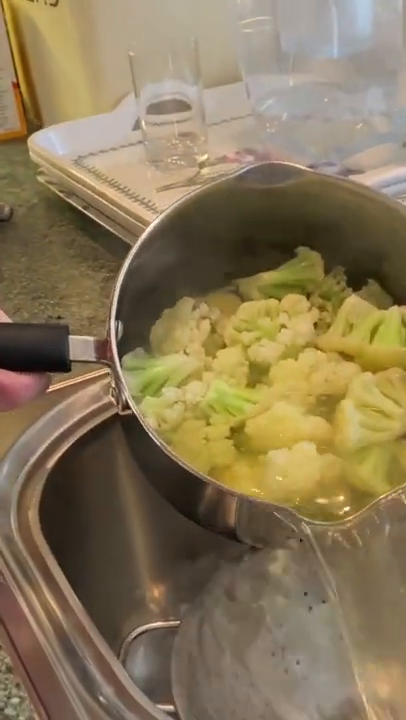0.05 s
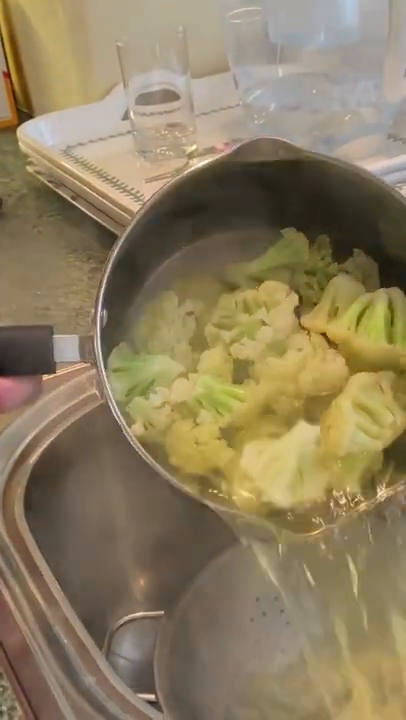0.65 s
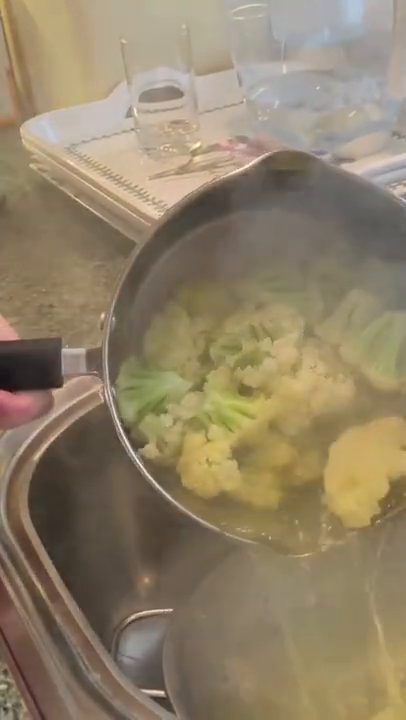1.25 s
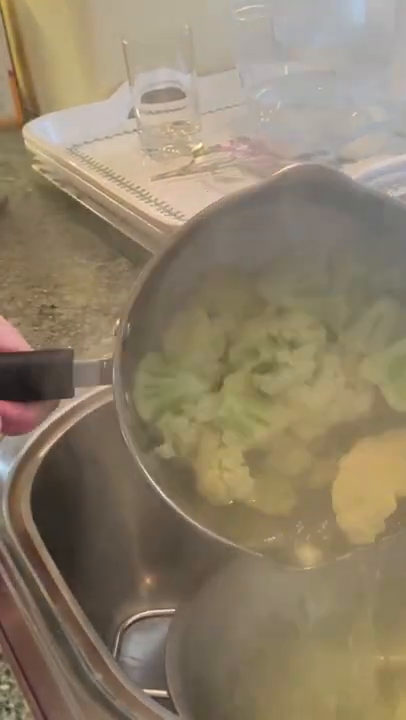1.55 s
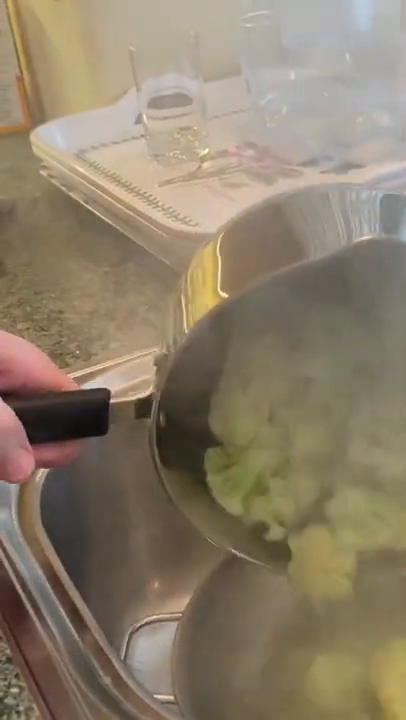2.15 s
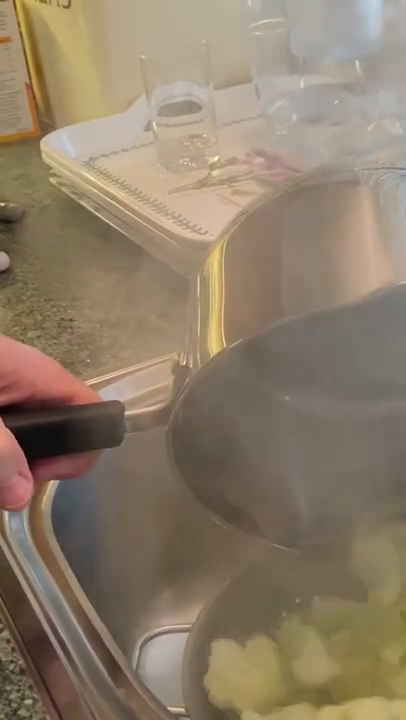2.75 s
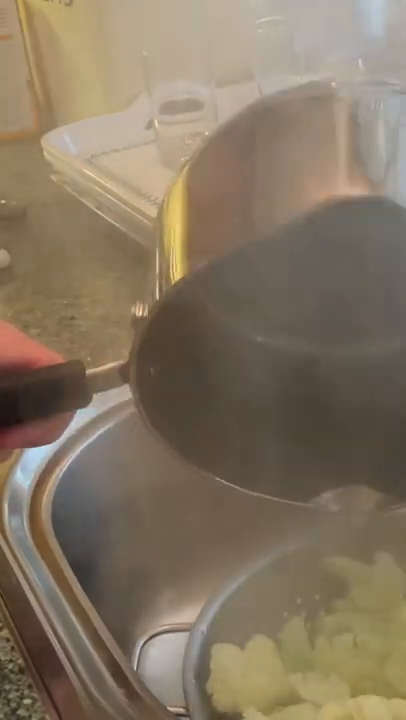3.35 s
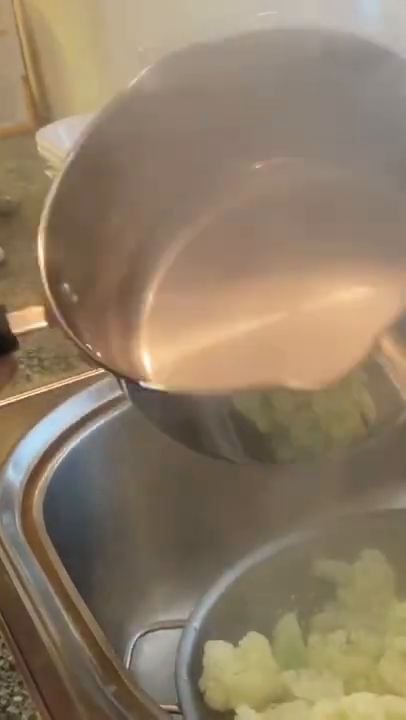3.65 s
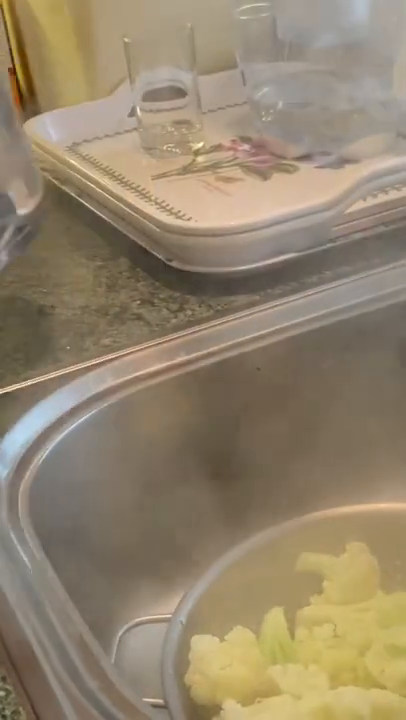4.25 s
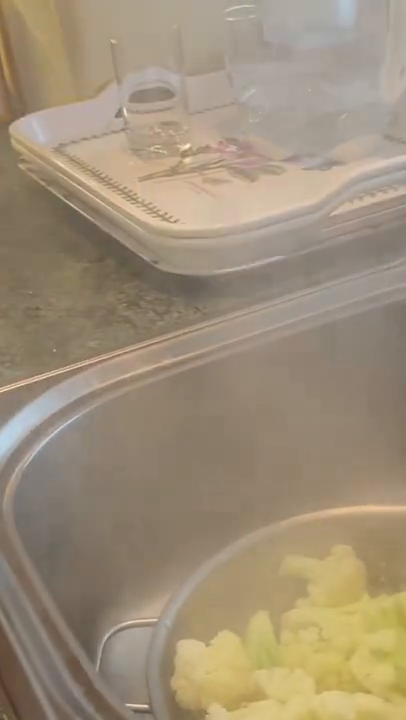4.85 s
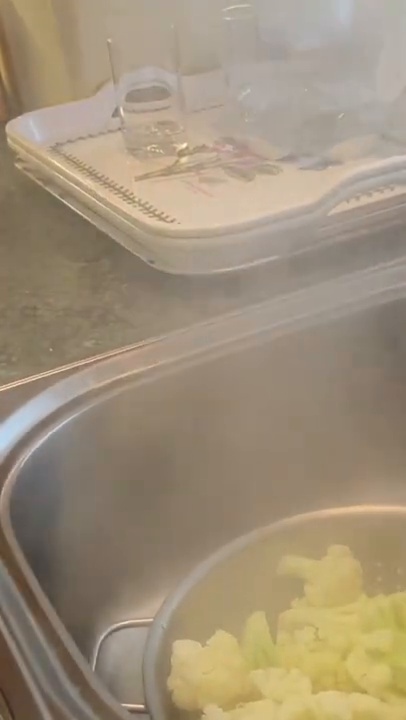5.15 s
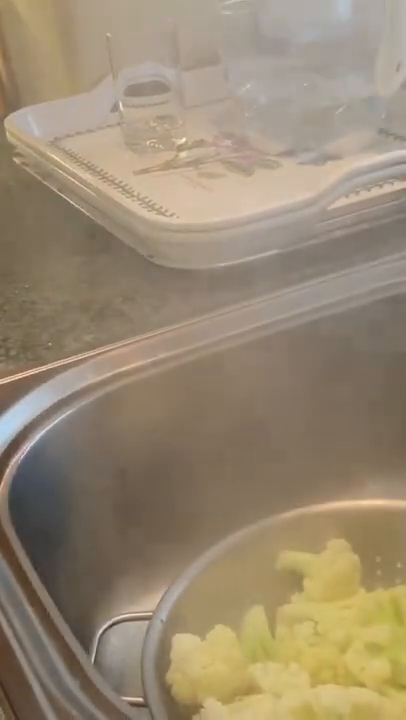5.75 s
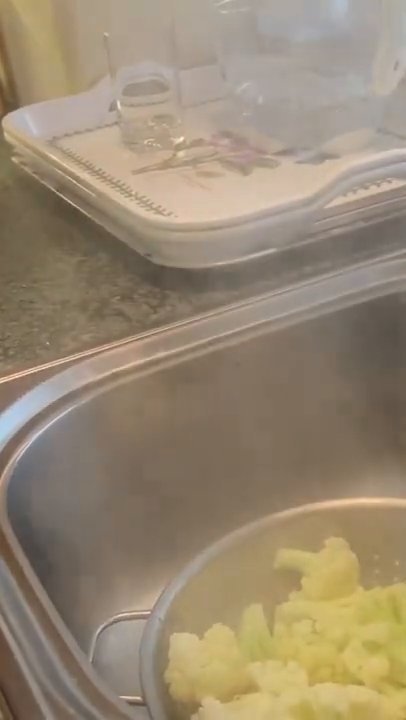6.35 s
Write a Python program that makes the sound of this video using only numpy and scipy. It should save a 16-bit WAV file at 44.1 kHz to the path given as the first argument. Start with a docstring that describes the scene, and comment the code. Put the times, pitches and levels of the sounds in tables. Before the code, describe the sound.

Water splashes into a steel sink as cooked cauliflower thuds into a colander, then the empty saucepan scrapes and clangs down hard.

```python
"""Water hisses and gurgles into a steel sink while cauliflower florets thud on the metal, tipped hot
from a saucepan into a colander. The water dribbles away, the pan scrapes, spray sizzles, then the empty
pan is knocked and set down hard, close by in a small kitchen. Water is a hail of tiny impacts plus
bubbles and drops; blows are decaying noise plus modes of basin and pan; scrapes are dense impacts
with brief wavering notes."""
import sys
import numpy as np
from scipy import signal
from scipy.fft import rfft, irfft
from scipy.io import wavfile
from scipy.ndimage import uniform_filter1d

SR = 44100
rng = np.random.default_rng(int(sys.argv[2]) if len(sys.argv) > 2 else 0)


def output_pcm(signal):
    """Save a mono or channel-first signal as 16-bit PCM at the path in sys.argv[1].

    Samples are clipped to [-1, 1] before scaling.
    """
    pcm = np.clip(np.atleast_2d(signal).T, -1, 1) * 32767
    wavfile.write(sys.argv[1], SR, np.round(pcm).astype(np.int16))


N = 282240

# basin modes: f/Hz, level/dB
SINK_MODES = [(239, -17.5), (297, 4), (328, 0), (377, -5), (430, -1), (491, 6.5), (548, 5), (640, 5),
              (923, -8)]
# spectrum of water on steel: f/Hz, level/dB
WATER_SPECTRUM = [(120, -25.5), (200, -18.5), (300, 3.5), (550, 0.5), (900, -4), (2200, -2), (4000, -13),
                  (5200, -12), (6800, -7.5), (7700, -20), (10500, -23), (13300, -13.5), (15000, -33)]
WATER_EDGES_HZ = [800, 4500, 7500]  # gurgle | splash | hiss | fizz
CONTROL_S, DROP_DECAY_S = .004, .004


def gain_of(db):
    """Decibels to amplitude."""
    return 10 ** (np.asarray(db) / 20)


def unit_rms(x):
    """Scales to rms 1."""
    return x / np.sqrt(np.mean(x ** 2) + 1e-20)


def add(mix, start_s, sound):
    """Mixes a sound in at start_s."""
    part = mix[max(round(start_s * SR), 0):][:len(sound)]
    part += sound[:len(part)]


def colour(x, spectrum, lo=1, hi=SR, ripple_db=0, size=4096, order=12):
    """Minimum-phase filter: a spectrum cut to lo-hi Hz, rippled as by many close resonances."""
    hz = np.fft.rfftfreq(size, 1 / SR) + 1
    f, db = np.transpose(spectrum)
    gain = gain_of(np.interp(np.log(hz), np.log(f), db - db.max()))
    gain /= np.sqrt((1 + (lo / hz) ** order) * (1 + (hz / hi) ** order))
    gain *= gain_of(ripple_db * unit_rms(uniform_filter1d(rng.standard_normal(len(hz)), 11)))
    cepstrum = irfft(np.log(gain + 1e-5))
    cepstrum[1:size // 2] *= 2
    cepstrum[size // 2 + 1:] = 0
    return signal.fftconvolve(x, irfft(np.exp(rfft(cepstrum)))[:size // 2])[:len(x)]


def bands(edges_hz):
    """(lo, hi) pairs that split the whole range."""
    return zip([1] + edges_hz, edges_hz + [SR])


def swell(t, start_s, length_s, t60_s, levels_db, rise_share, arch_db):
    """Band powers of one gush or stroke: it builds, arches and dies away."""
    done = np.clip((t - start_s) / length_s, 0, 1)
    db = np.c_[levels_db] - np.c_[arch_db] * (2 * done - 1) ** 2
    db -= 60 * np.maximum(t - start_s - length_s, 0) / t60_s
    return (np.minimum(done / np.c_[rise_share], 1) * gain_of(db)) ** 2


def water_levels():
    """Gushes over a trickle, as rows of t/s and four band levels/dB."""
    # gushes: t/s, length/s, t60/s, gurgle/dB, splash/dB, hiss/dB, fizz/dB
    gushes = [(0.0, 0.24, 0.5, -67, -69, -46, -67), (0.115, 0.57, 0.58, -59, -43.5, -43, -55.5),
              (0.64, 0.42, 1, -24.5, -40, -69, -58.5), (1.081, 0.009, 0.2, -32, -36, -50, -33.5),
              (2.061, 0.15, 0.44, -54, -52, -54.5, -58), (2.225, 0.046, 0.54, -44.5, -44, -55, -53.5),
              (4.091, 0.99, 0.39, -36, -38.5, -43, -45.5), (5.052, 0.055, 0.1, -42.5, -39.5, -44, -50)]
    # colander draining: t/s, level/dB
    trickle = [(0.1, -79), (1.2, -61.5), (2.0, -60), (2.45, -57.5), (2.95, -60), (3.25, -74), (4.05, -84),
               (5.3, -45), (6.4, -49)]
    ref_db, bands_at_ref_db, db_per_db = -65, [-59, -70.5, -76.5, -77.5], [.55, 1.022, 1.03, 1.05]
    rise_share, arch_db = [.49, .058, .027, .22], [15.2, 7.3, 4.6, 4.8]
    t = np.arange(0, N / SR, CONTROL_S)
    trickle_db = np.interp(t, *np.transpose(trickle)) - ref_db
    power = gain_of(np.c_[bands_at_ref_db] + np.c_[db_per_db] * trickle_db) ** 2
    for s, length_s, t60_s, *levels_db in gushes:
        power += swell(t, s, length_s, t60_s, levels_db, rise_share, arch_db)
    return np.column_stack([t, *10 * np.log10(power)])


def hail(curve, spectrum, edges_hz, per_s, spread_db, wash, tail_s, patchy_db, ripple_db):
    """Tiny impacts with noisy tails over an even wash; the resonances they stir keep shifting."""
    s, *levels_db = np.transpose(curve)
    t, out = np.arange(N) / SR, np.zeros(N)
    for db, patch_db, (lo, hi) in zip(levels_db, patchy_db, bands(edges_hz)):
        hits = gain_of(spread_db * np.minimum(rng.exponential(1, N), 4.5)) * (rng.random(N) < per_s / SR)
        tails = np.sqrt(signal.lfilter([1], [1, -np.exp(-2 / (tail_s * SR))], hits ** 2))
        drive = .5 * unit_rms(hits * rng.choice([-1, 1], N))
        drive += (unit_rms(tails) + wash) * rng.standard_normal(N)
        frames = signal.stft(drive, nperseg=512)[2]
        patches = uniform_filter1d(rng.standard_normal(frames.shape), 5, axis=0)
        patches = unit_rms(uniform_filter1d(patches, 6, axis=1))
        drive = signal.istft(frames * gain_of(patch_db * patches))[1][:N]
        out += gain_of(np.interp(t, s, db)) * unit_rms(colour(drive, spectrum, lo, hi, ripple_db))
    return out * np.interp(t, [s[0] - .02, s[0], s[-1], s[-1] + .03], [0, 1, 1, 0])


def water(curve):
    """Droplets pelt the steel, each size in its own band; fine spray is the most even."""
    return gain_of(-3.14) * hail(curve, WATER_SPECTRUM, WATER_EDGES_HZ, per_s=1100, spread_db=4,
                                 wash=.5, tail_s=.004, patchy_db=[5, 4, 3, 2], ripple_db=2)


def bubbles(curve, per_s=26, level_db=-4.5, decay_cycles=21.3, count=280):
    """Bubbles pop with a short rising note; level follows the water in their band."""
    s, *levels_db = np.transpose(curve)
    out, t, at_s = np.zeros(N), np.arange(SR // 16) / SR, 0
    for wait, pitch, size in rng.random((count, 3)):
        at_s += 2 * wait / per_s
        hz = 350 * 7 ** pitch
        water_db = np.interp(at_s, s, levels_db[np.searchsorted(WATER_EDGES_HZ, hz)])
        age = t * hz / decay_cycles
        note = np.exp(-age) * np.sin(2 * np.pi * hz * t * (1 + .013 * age))
        add(out, at_s, gain_of(water_db + level_db + 9.9 * size ** 2) * note)
    return out


def plops(swell_s=.0082, bend=.1, linger_s=.03):
    """Soft florets and drops swell one resonance; the wet smear around it grows with pitch."""
    # soft landings: t/s, level/dB, f/Hz
    landings = [(0.0, -49, 557), (1.121, -37, 470), (1.234, -40.5, 504), (1.344, -46, 505),
                (1.53, -48, 514), (2.169, -49, 382), (2.426, -47.5, 734), (2.44, -50, 283),
                (2.578, -56, 950), (2.655, -45.5, 295), (2.859, -52.5, 483), (3.059, -47, 486),
                (3.111, -67.5, 1910), (3.46, -40.5, 336), (3.509, -45, 293), (3.535, -53, 1166),
                (3.62, -51, 650), (3.675, -56, 1170), (3.721, -46.5, 356), (3.795, -52, 417),
                (3.8, -56, 1290), (3.845, -56.5, 1830), (3.859, -42, 412)]
    out, t = np.zeros(N), np.arange(SR // 6) / SR
    for s, db, hz in landings:
        age = t / swell_s
        hump = age * np.exp(1 - age) + .25 * np.tanh(age) * np.exp(-t / linger_s)
        tone = np.sin(2 * np.pi * np.cumsum(hz * (1 + bend * (hump - .5))) / SR)
        smear = unit_rms(colour(rng.standard_normal(len(t)), WATER_SPECTRUM, hz * .66, hz * .99))
        add(out, s, gain_of(db) * hump * (2.21 * tone + .6 * hz / 800 * smear))
    return out


def spit(lo_hz, hi_hz, tail_db=-9, t60_s=.12):
    """One drop on steel: a tick and a short wet tail."""
    t = np.arange(SR // 8) / SR
    fall = np.exp(-t / DROP_DECAY_S) + gain_of(tail_db - 60 * t / t60_s)
    band = signal.butter(4, [lo_hz, min(hi_hz, SR / 2 - 10)], "bandpass", fs=SR, output="sos")
    return signal.sosfilt(band, fall * unit_rms(signal.sosfilt(band, rng.standard_normal(len(t)))))


def drops(curve, per_band_per_s=7, level_db=-6, spread_db=11):
    """Large drops spit on bare steel; small ones tick at a level that follows the water."""
    # large drops: t/s, level/dB, low f/Hz, high f/Hz
    large_drops = [(0.46, -34.5, 5170, 7100), (2.993, -31, 790, 1880), (3.896, -31, 856, 1720),
                   (3.947, -33.5, 1000, 1760), (4.172, -31.5, 1710, 6240), (4.256, -30, 1280, 2360),
                   (4.316, -43, 5060, 14100), (4.488, -39, 1000, 6050), (4.529, -29.5, 3120, 7000),
                   (4.703, -32, 1510, 7560), (4.768, -27, 338, 2230)]
    s, *levels_db = np.transpose(curve)
    out = np.zeros(N)
    for at_s, db, lo, hi in large_drops:
        add(out, at_s, gain_of(db) * spit(lo, hi))
    for hz in np.geomspace(1800, 13000, 12):
        tick = spit(hz * .75, hz * 1.3)
        tick *= np.exp(-np.arange(len(tick)) / SR / DROP_DECAY_S)
        for when, size in rng.random((int(per_band_per_s * N / SR), 2)):
            at_s = when * N / SR
            water_db = np.interp(at_s, s, levels_db[np.searchsorted(WATER_EDGES_HZ, hz)])
            add(out, at_s, gain_of(water_db + level_db + spread_db * size ** 2) * tick)
    return out


def ring(modes, t, t60_s, scatter_db=0, detune=0, beat_hz=14):
    """Decaying modes in beating pairs; each blow lands elsewhere, scattering level and pitch."""
    hz, db = np.transpose(modes)[:, :, None]
    size = gain_of(db + scatter_db * rng.standard_normal(db.shape)) * rng.choice([-1, 1], db.shape)
    hz = hz * (1 + detune * rng.standard_normal(db.shape))
    twin_hz = hz + beat_hz * rng.standard_normal(db.shape)
    pairs = np.sin(2 * np.pi * hz * t) + .5 * np.sin(2 * np.pi * twin_hz * t)
    contact = 1 - np.exp(-(t / .0012) ** 2)
    return (size * pairs).sum(0) * contact * gain_of(-60 * t / t60_s) / np.sqrt((size ** 2).sum())


def sheet(t, levels_db, edges_hz, t60_s, spectrum, crack_db, crack_s, t60_scales, rattle):
    """Struck sheet metal: a crack, then dense modes as rattling noise that decays band by band."""
    out = np.zeros(len(t))
    for db, (lo, hi), scale in zip(levels_db, bands(edges_hz), t60_scales):
        fall = gain_of(-60 * t / (t60_s * scale)) + gain_of(crack_db) * np.exp(-t / crack_s)
        chatter = np.exp(rattle * unit_rms(uniform_filter1d(rng.standard_normal(len(t)), 150)))
        part = colour(rng.standard_normal(len(t)) * fall * chatter, spectrum, lo, hi, ripple_db=3.2)
        out += gain_of(db) * part / np.sqrt((part ** 2).sum() / (SR * .017))
    return out


def sink_thuds(t60_s=.24, push_s=.032, thud_top_hz=800, splash_top_hz=7500, fizz_db=-8.5):
    """Florets, and a few later heavy drops, drum on sink and colander: a short heavy push, then a quieter ring."""
    # landings: t/s, thud/dB, clack/dB, splash/dB, main resonance/Hz, top of clack/Hz
    landings = [(0.134, -37.5, -29, -51, 958, 2110), (0.515, -30.5, -32.5, -42, 337.5, 2010),
                (0.572, -42.5, -32.5, -41.5, 284, 2200), (0.765, -25, -43, -33.5, 450, 2470),
                (0.817, -16.5, -17, -31.5, 302, 2030), (0.840, -27, -28, -28.5, 396, 2340),
                (0.955, -27.5, -33, -51, 410.4, 2400), (1.086, -32, -38.5, -46.5, 329, 2970),
                (1.303, -38.5, -42, -46.5, 522, 2480), (1.491, -36, -41, -62.5, 303.4, 1557),
                (2.079, -50, -43, -43, 498, 2400), (2.134, -54, -41, -38.5, 659, 2540)]
    # landing spectrum: f/Hz, level/dB
    spectrum = [(190, -15), (300, -2), (420, -0.5), (720, -11), (1550, -15.5), (2100, -21.5), (4000, -33.5),
                (6500, -21.5), (8000, -37.5), (10500, -45), (13000, -27.5), (15000, -49)]
    out, t = np.zeros(N), np.arange(SR // 2) / SR
    push = .22 + np.exp(-(t / push_s) ** 2)
    for s, thud_db, clack_db, splash_db, hz, top_hz in landings:
        levels_db = [thud_db, clack_db, splash_db, splash_db + fizz_db]
        blow = sheet(t, levels_db, [thud_top_hz, top_hz, splash_top_hz], t60_s, spectrum,
                     crack_db=0, crack_s=.009, t60_scales=[.96, 1.4, .56, .44], rattle=.26)
        basin = gain_of(thud_db - .5) * ring(SINK_MODES, t, t60_s, scatter_db=2, detune=.0042)
        tone_db = (thud_db if hz < thud_top_hz else clack_db - 7) + 3.5
        tone = gain_of(tone_db) * ring([(hz, 0)], t, t60_s, beat_hz=6.2)
        add(out, s, blow + (basin + tone) * push)
    return out


def pan_squeaks(wavers=4, roughness=.52):
    """Steel rubbing on steel sustains one unsteady note; the shorter, the raspier."""
    # notes: t/s, length/s, level/dB, f/Hz
    notes = [(3.297, 0.18, -44, 736), (3.43, 0.1, -62, 1750), (3.886, 0.076, -41.5, 288.5),
             (5.811, .11, -28, 333.2), (5.874, 0.025, -44, 2600), (5.961, 0.083, -39, 1884),
             (5.996, 0.035, -37, 3000), (6.093, 0.23, -47, 1950), (6.298, 0.043, -46, 1315)]
    out = np.zeros(N)
    for s, length_s, db, hz in notes:
        t = np.arange(0, length_s, 1 / SR)
        smoothing = signal.butter(2, wavers / length_s, fs=SR, output="sos")
        slip = signal.sosfilt(smoothing, rng.standard_normal((2, SR // 2)))[:, -len(t):]
        waver = 1 + roughness * (unit_rms(slip[0]) + 1j * unit_rms(slip[1]))
        note = (waver * np.exp(2j * np.pi * hz * t)).real
        add(out, s, gain_of(db) * unit_rms(note) * np.sin(np.pi * t / length_s))
    return out


def pan_scrapes(t60_s=.25):
    """The pan slides in short strokes, each a dense run of tiny impacts."""
    # strokes: t/s, length/s, groan/dB, rasp/dB, hiss/dB
    strokes = [(3.298, 0.047, -38, -46.5, -54), (3.391, 0.05, -36.5, -49.5, -54),
               (3.45, 0.13, -40, -65, -74.5), (3.62, 0.098, -50, -56, -95),
               (3.77, 0.021, -47.5, -65, -50.5), (3.812, 0.21, -56, -53, -53.5)]
    # rubbing spectrum: f/Hz, level/dB
    spectrum = [(205, -19.5), (300, 11.5), (560, 3), (730, -5), (900, -17), (1600, -14.5), (2100, -21.5),
                (3400, -36.5), (4200, -43.5), (5000, -31), (6800, -20.5), (8200, -44), (14000, -49)]
    t = np.arange(0, N / SR, CONTROL_S)
    power = sum(swell(t, s, length_s, t60_s, levels_db, rise_share=[.2, .15, .12], arch_db=[7.5, 5, 8])
                for s, length_s, *levels_db in strokes)
    curve = np.column_stack([t, *10 * np.log10(power + 1e-20)])
    return hail(curve, spectrum, WATER_EDGES_HZ[:2], per_s=900, spread_db=2,
                wash=.8, tail_s=.01, patchy_db=[5, 4, 3], ripple_db=3)


def pan_knocks():
    """The pan strikes the sink: the basin booms and the pan wall rings."""
    # hits: t/s, thud/dB, clack/dB, crash/dB, main resonance/Hz, its level/dB, base t60/s
    hits = [(5.183, -15.5, -22, -54, 894, -14, 0.17), (5.263, -20.5, -23.5, -47, 655, -21, 0.092),
            (5.302, -19, -22, -43, 339, -20.5, 0.38), (5.501, -30.5, -40, -24.5, 403, -23.5, 0.34),
            (5.527, -24, -29.5, -24, 491, -24.5, 0.37), (5.568, -16.5, -43, -16, 485.7, -12, 0.26),
            (5.583, -13.5, -18, -16.5, 491, -13, 0.42), (5.736, -29, -33, -31, 544, -28, 0.4),
            (5.772, -19, -20.5, -24, 342, -14, 0.25), (5.799, -25.5, -33, -27, 360, -35, 0.24),
            (6.034, -14, -11.5, -24.5, 239.3, -12.5, 0.28), (6.086, -17, -15, -24.5, 651.5, -13, 0.23)]
    # pan wall modes: f/Hz, level/dB
    pan_modes = [(1176, 11.5), (1732, -6), (1826, -7), (1868, 11.5), (1923, 14.5), (1996, 7.5),
                 (2074, -9.5), (2343, 8.5), (3339, 5), (3726, 1), (4044, -1), (4762, -6), (5055, -18)]
    # knock spectrum: f/Hz, level/dB
    spectrum = [(170, -15.5), (230, -16), (350, 4), (660, 2.5), (800, -5.5), (1600, -10), (2000, -7.5),
                (2900, -21), (6800, -24.5), (7800, -32), (10500, -40.5), (13200, -39.5), (15000, -55)]
    edges_hz = [800, 3600]
    out, t = np.zeros(N), np.arange(SR * 3 // 4) / SR
    push, basin_rise = .4 + 1.3 * np.exp(-(t / .02) ** 2), 1 - np.exp(-t / .002)
    for s, thud_db, clack_db, crash_db, hz, tone_db, t60_s in hits:
        blow = gain_of(1) * sheet(t, [thud_db, clack_db, crash_db], edges_hz, t60_s, spectrum,
                                  crack_db=5.5, crack_s=.012, t60_scales=[1.15, 1.15, .85], rattle=.18)
        tone = gain_of(tone_db) * ring([(hz, 0)], t, t60_s * .8, beat_hz=5)
        basin = gain_of(thud_db - 5) * ring(SINK_MODES, t, t60_s * 1.2, scatter_db=2, detune=.002)
        wall = gain_of(crash_db - 1) * ring(pan_modes, t, t60_s, scatter_db=4, detune=.003)
        add(out, s, blow + tone * push + basin * basin_rise + wall)
    return out


def room_air(level_db=-71.5):
    """Faint steady background noise."""
    # background spectrum: f/Hz, level/dB
    spectrum = [(200, 1.5), (300, -7.5), (1100, -7), (4000, -54), (6700, -29), (8000, -27.5), (14000, -32)]
    return gain_of(level_db) * unit_rms(colour(rng.standard_normal(N), spectrum))


def kitchen(x, t60_s=.3, wet_db=-17, delay_s=.008):
    """Adds the small room's faint, short echo."""
    t = np.arange(SR // 2) / SR
    reflections = rng.standard_normal(len(t)) * gain_of(-60 * t / t60_s) * (t > delay_s)
    tail = colour(reflections, [(200, 2.5), (2000, -4.5), (12000, -25.5)])
    return x + gain_of(wet_db) * signal.fftconvolve(x, tail / np.linalg.norm(tail))[:N]


def scene():
    """The sink, straight ahead: both channels alike."""
    curve = water_levels()
    sink = water(curve) + pan_scrapes()
    air = room_air()
    sink += bubbles(curve) + drops(curve) + pan_squeaks() + sink_thuds() + pan_knocks() + plops()
    mix = kitchen(sink) + air
    return np.array([mix, mix])


def record(dry, rumble_hz=202.6, leak_db=-27, ceiling=.92, cutoff_hz=14700):
    """Steep rumble filter with a dry leak, soft clip of the loudest knocks, band limit."""
    rumble_filter = signal.butter(8, rumble_hz, "highpass", fs=SR, output="sos")
    lean = signal.sosfilt(rumble_filter, dry) + gain_of(leak_db) * dry
    clipped = lean / (1 + (lean / ceiling) ** 8) ** (1 / 8)
    band_limit = signal.firwin(127, cutoff_hz, window=("kaiser", 9), fs=SR)
    return signal.oaconvolve(clipped, band_limit[None], "same")


dry = scene()
out = record(dry)
output_pcm(out)
```